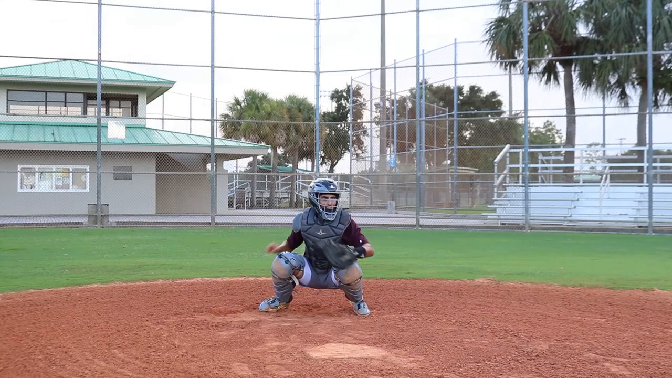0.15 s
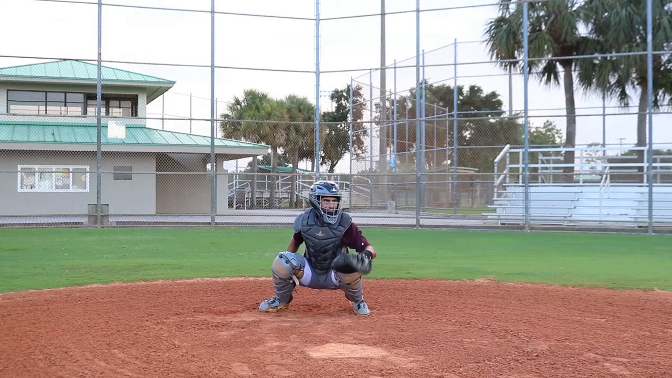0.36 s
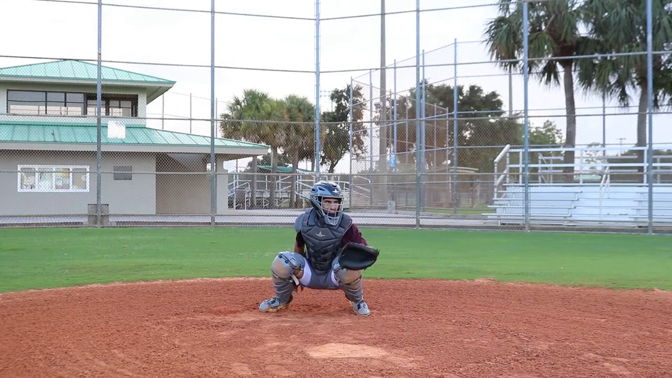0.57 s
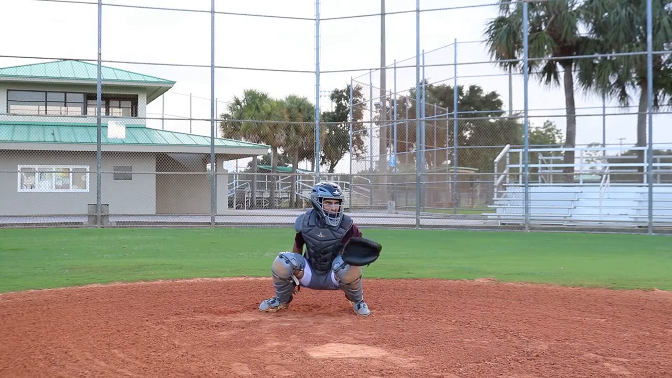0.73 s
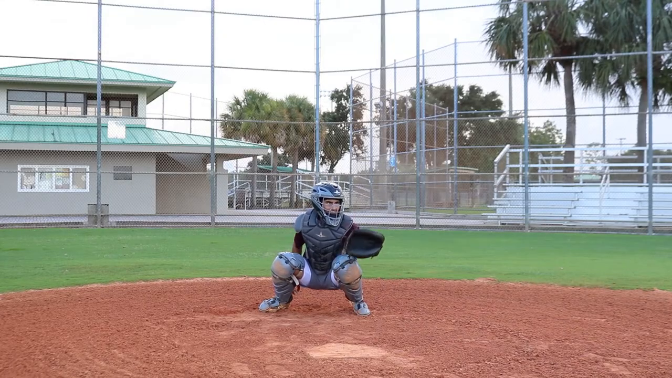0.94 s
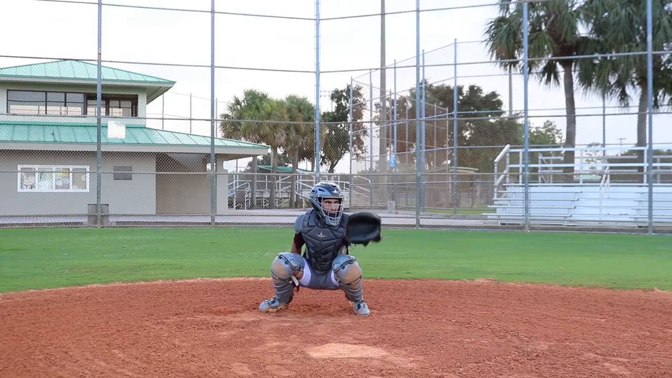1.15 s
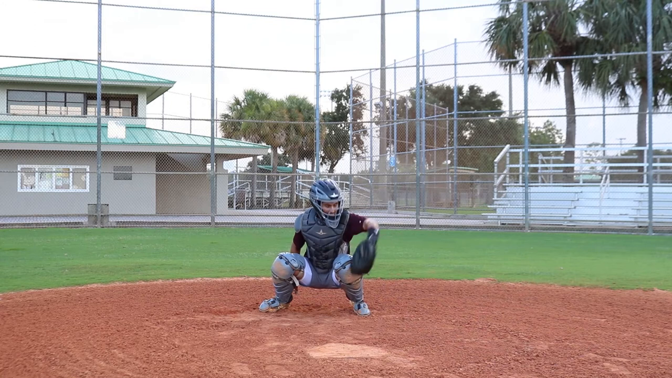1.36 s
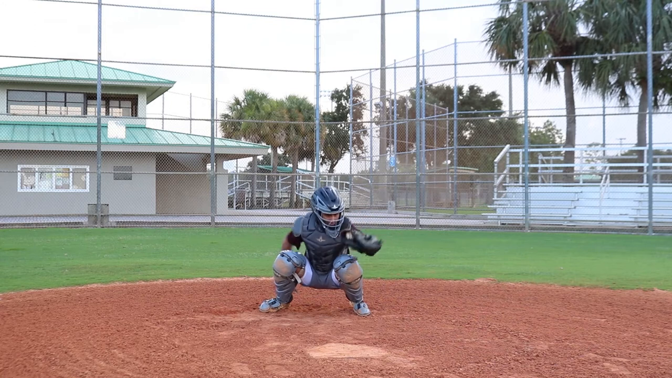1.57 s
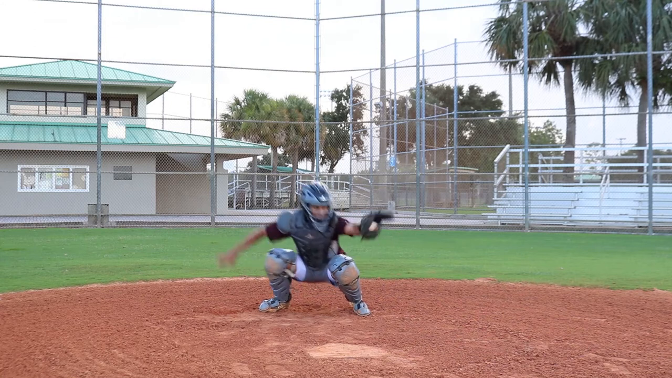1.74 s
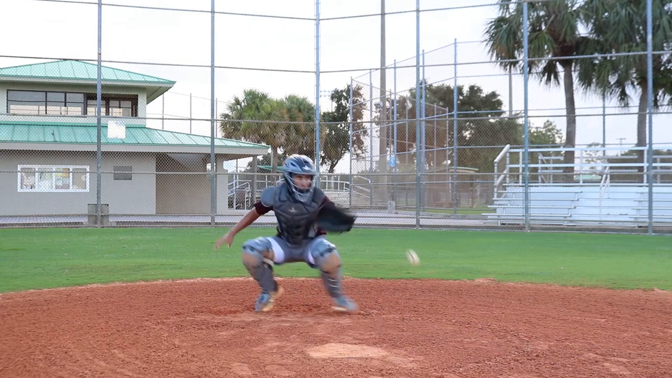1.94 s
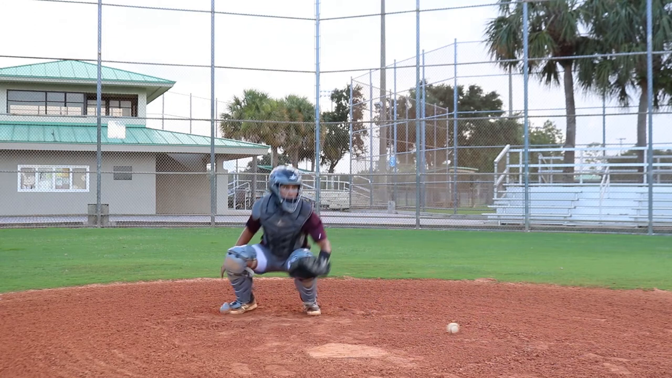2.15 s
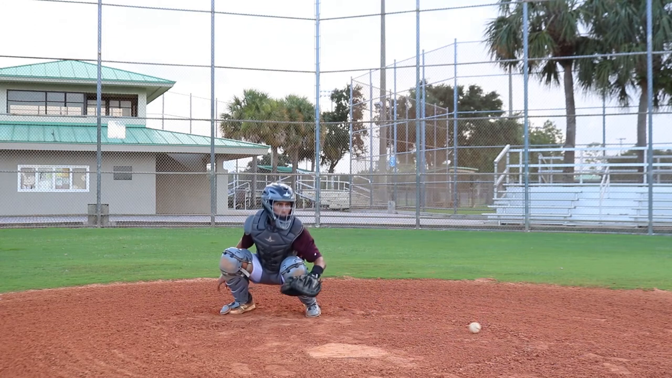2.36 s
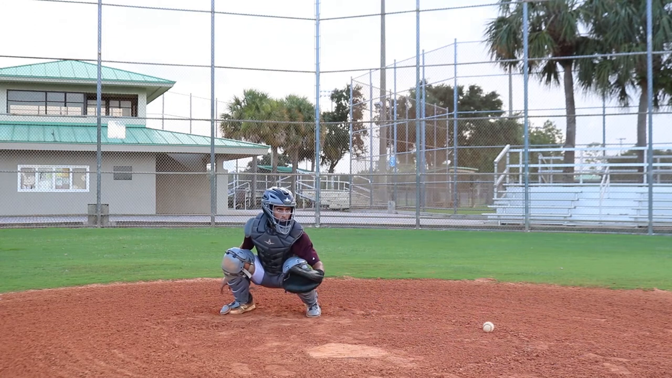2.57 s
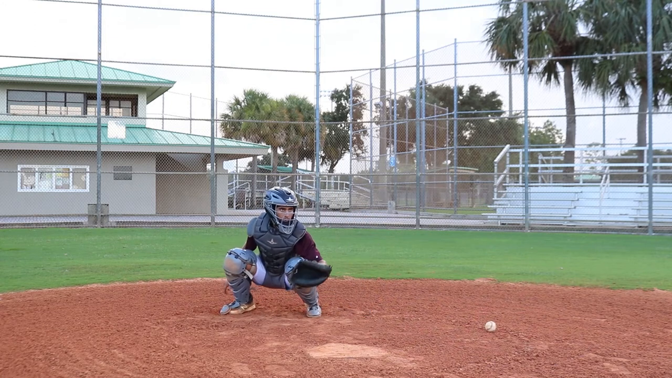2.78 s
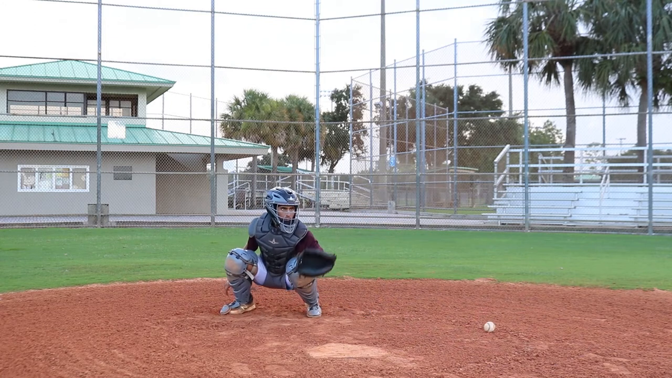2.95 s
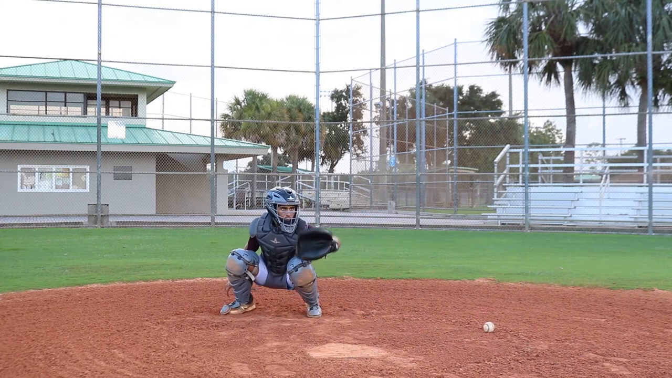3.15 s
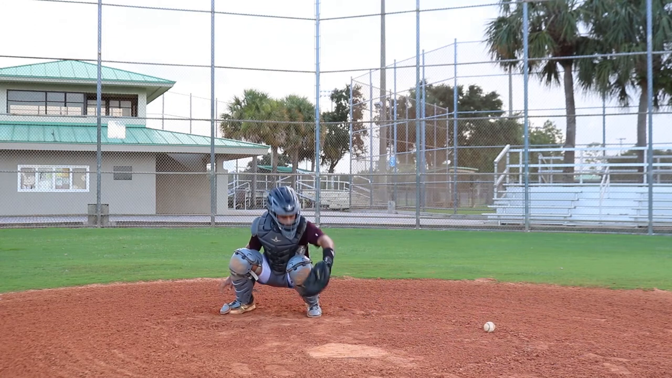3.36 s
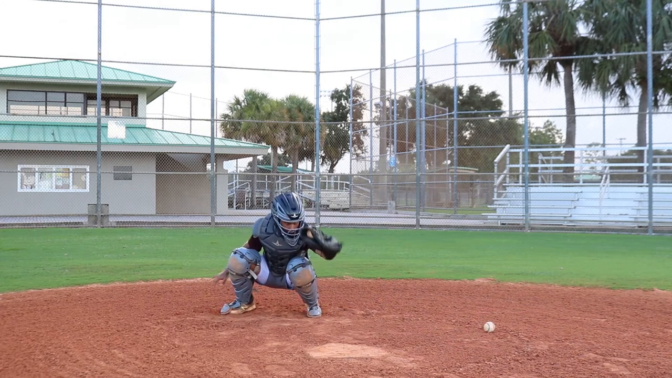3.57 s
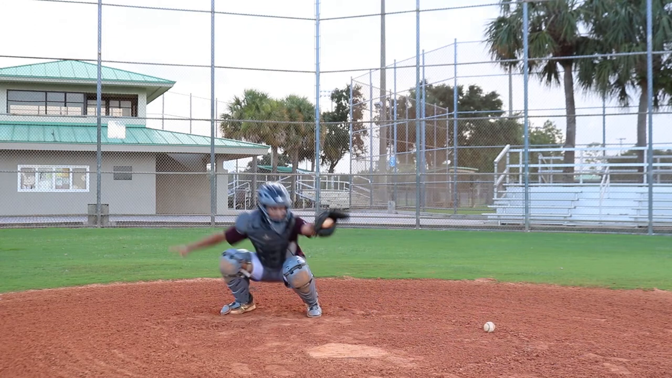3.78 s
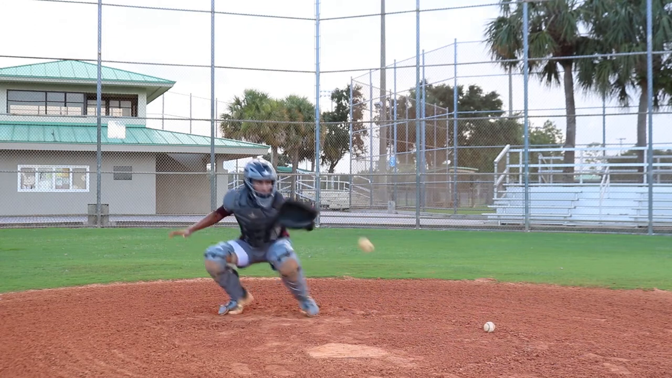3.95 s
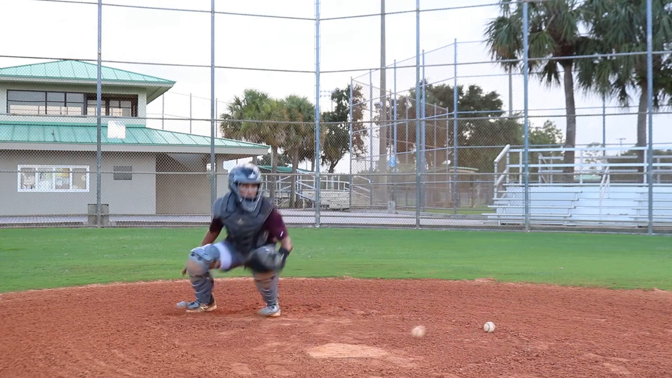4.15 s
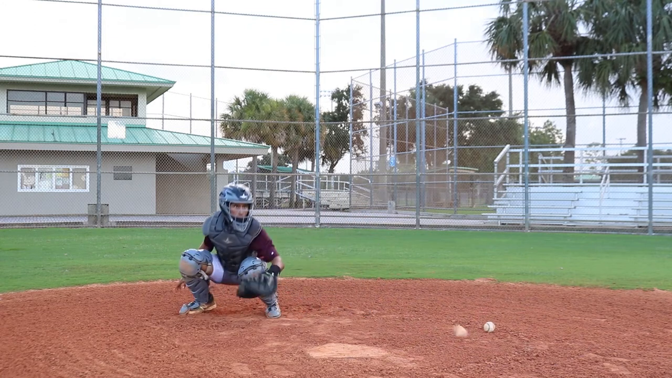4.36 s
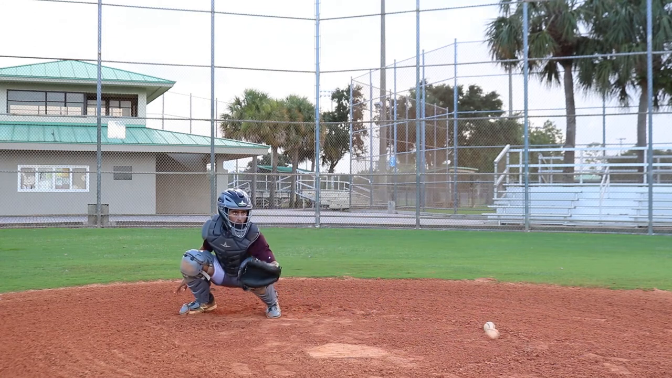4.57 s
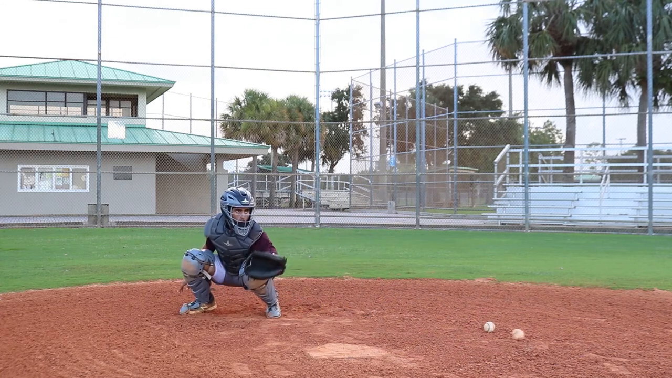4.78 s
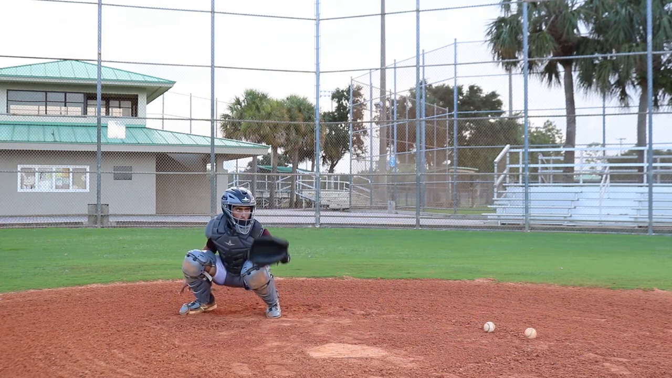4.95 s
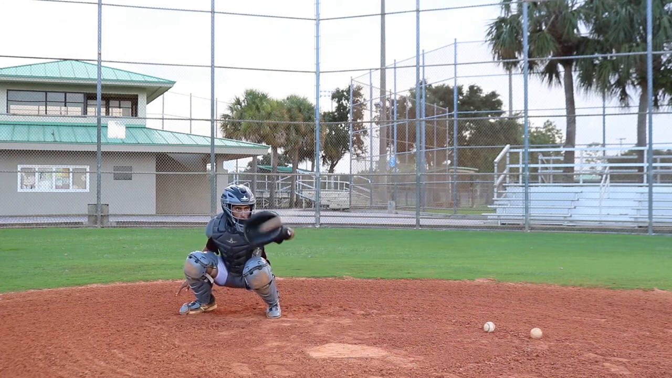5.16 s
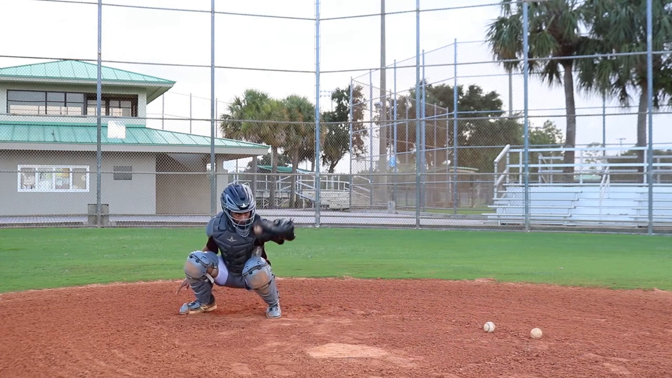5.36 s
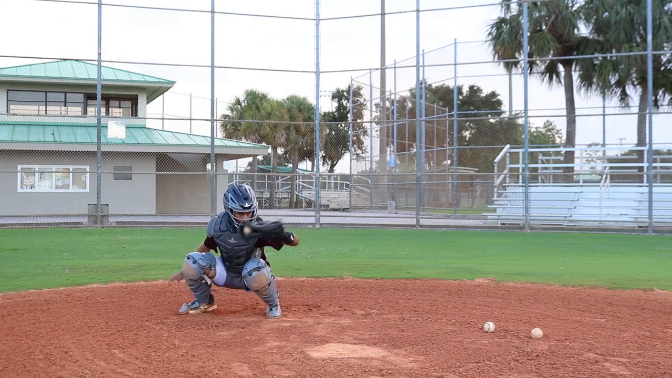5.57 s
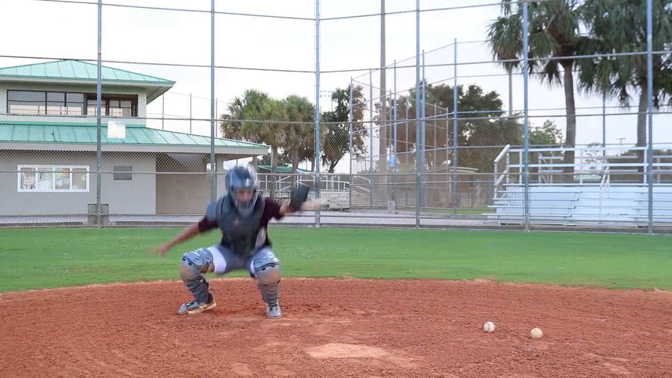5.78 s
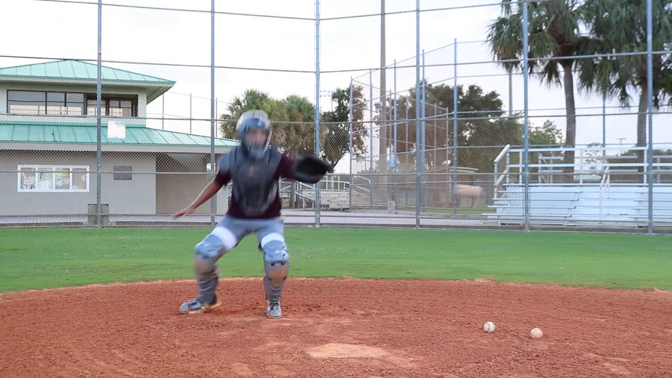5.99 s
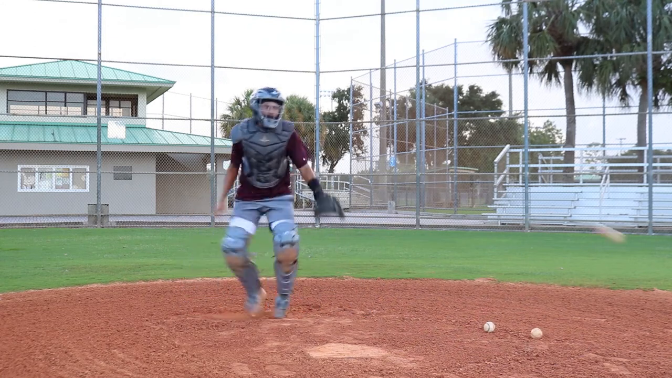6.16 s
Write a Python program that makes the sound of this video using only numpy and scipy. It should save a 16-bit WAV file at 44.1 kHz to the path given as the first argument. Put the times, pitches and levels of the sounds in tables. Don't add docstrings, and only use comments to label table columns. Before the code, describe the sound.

Outdoors, balls pop sharply into a catcher's mitt three times, each answered by quick slapback, with soft dirt thuds and gear ticks between.

```python
import sys
import numpy as np
from scipy import signal
from scipy.fft import rfft, irfft
from scipy.io import wavfile
from scipy.ndimage import uniform_filter1d

SR = 44100
rng = np.random.default_rng(int(sys.argv[2]) if len(sys.argv) > 2 else 0)


def to_wav(s):
    ch = np.atleast_2d(s).T
    pcm = np.round(np.clip(ch, -1, 1) * 32767)
    wavfile.write(sys.argv[1], SR, pcm.astype(np.int16))


def level_to_linear(level):
    exponent = np.asarray(level, float) / 20
    return 10 ** exponent


N = 274302
T = np.arange(N) / SR

# start_s, blow_db, crack_db, grit_db
CATCHES = [
    (1.3929, 10, -0.5, -30),
    (3.361, 8, -22, -21),
    (5.2459, 12, 5, -30),
]
# late_s, thump_db, near_extra_db, slap_db, thump_hz
RETURNS = [(-0.0007, -1.8, -7, 0.5, 320), (0.0006, 2, 5, -1.5, 300), (0.0001, -2, -3, 0.9, 318)]
SLAP_HZ = 1360
SLAP_LEAD_S = 1 / (2 * SLAP_HZ)


def level(x, db):
    return x * level_to_linear(db) / np.sqrt(np.mean(x ** 2))


def tint(points):
    hz, db = np.transpose(points)
    f = np.fft.rfftfreq(N, 1 / SR) + 1
    gain = level_to_linear(np.interp(np.log(f), np.log(hz), db))
    return irfft(rfft(rng.standard_normal(N)) * gain, N)


def band(x, lo_hz, hi_hz):
    sos = signal.butter(2, [lo_hz, min(hi_hz, 0.45 * SR)], "band", fs=SR, output="sos")
    return signal.sosfilt(sos, x)


def walk(rate_hz):
    hold = int(SR / rate_hz)
    steps = np.repeat(rng.standard_normal(N // 100), hold)[:N]
    return 1.292 * uniform_filter1d(uniform_filter1d(steps, hold), hold)


def fade(t, t60):
    return (t >= 0) * np.exp(-np.log(1000) * np.abs(t) / t60)


def add(out, s, make, size=2048):
    i = int(s * SR)
    piece = make(T[:size] - (s - i / SR))[:N - i]
    out[i:i + len(piece)] += piece


def road():
    # frequency_hz, density_db
    roar_spectrum = [(18, -30), (30, -27), (48, -5), (90, -4.5), (118, -3.5), (184, -3.5), (259, -8),
                     (287, -12.5), (345, -11), (449, -20), (822, -11.5), (1100, -9), (3870, -35),
                     (14800, -46.5), (16000, -42)]
    # time_s, level_db
    traffic = [(0.0, -46.5), (0.26, -41), (0.74, -42), (1.12, -39), (1.52, -36.5), (1.77, -34.5),
               (2.77, -42), (3.07, -36.5), (3.45, -41), (3.86, -34), (4.23, -35.5), (4.88, -40.5),
               (5.04, -36.5), (5.21, -38), (5.42, -38.5), (5.6, -35.5), (6.01, -44), (6.22, -35)]
    # frequency_hz, level_db
    hum_tones = [(128, -42.5), (258, -46.5)]
    road_db = -36
    load_db = np.interp(T, *np.transpose(traffic))
    load_db = load_db - np.mean(load_db[:SR])
    engines_db, deep_db = 0.95 * load_db, 1.05 * load_db
    tyres_db = 0.9 * np.exp(-((T - 4.6) / 0.97) ** 2)
    spectrum = rfft(level(tint(roar_spectrum), road_db))
    f = np.log2(np.fft.rfftfreq(N, 1 / SR) + 1)
    roar = 0
    for octave in np.arange(4, 14.6, 0.5):
        overlap = np.sqrt(np.clip(1 - 2 * np.abs(f - octave), 0, 1) / 2)
        part = irfft(spectrum * overlap, N)
        bass = np.clip((8.5 - octave) / 1.77, 0, 1)
        middle = (1 - bass) * np.clip((12.2 - octave) / 1.4, 0, 1)
        bass_db = engines_db if 2 ** octave > 95 else deep_db
        flicker_db = (-0.02 + 1.66 * bass) * walk(9.8)
        roar = roar + part * level_to_linear(bass * bass_db + middle * tyres_db + flicker_db)
    hum = 0
    for hz, db in hum_tones:
        strength = level_to_linear(db + 5.5 * walk(4))
        turns = np.cumsum(hz * (1 + 0.02433 * walk(8.2))) / SR
        hum = hum + strength * np.sin(2 * np.pi * turns)
    return level(roar, road_db + 1.73) + hum


def whistle(t, length, hz, db, fall_hz):
    crest, swell_db, arch_hz, fall_s = 0.89, 19, 100, 0.017
    u = np.clip(t / length, 0, 1)
    edge = np.clip(np.minimum(t, length - t) / 0.004, 0, 1)
    away = np.where(u < crest, 1 - u / crest, (u - crest) / (1 - crest))
    drop = np.clip(1 - (length - t) / fall_s, 0, 1) ** 2
    pitch = hz + arch_hz * np.sin(np.pi * u) - fall_hz * drop
    return edge * level_to_linear(db - swell_db * away ** 2) * np.sin(2 * np.pi * np.cumsum(pitch) / SR)


def bird():
    # start_s, length_s, pitch_hz, level_db, closing_fall_hz
    calls = [(0.005, 0.1, 7060, -40.5, 400), (0.306, 0.029, 7020, -50.5, 330),
             (3.392, 0.051, 6560, -41, 170), (3.594, 0.071, 6720, -52, 15), (3.67, 0.14, 6700, -63, 5),
             (4.866, 0.04, 6930, -53, 10), (5.183, 0.043, 7050, -48, 40)]
    out = np.zeros(N)
    for s, *call in calls:
        add(out, s, lambda t: whistle(t, *call), size=8192)
    return out + level_to_linear(-20) * np.interp(T - 0.05, T, out)


def shuffle():
    # frequency_hz, density_db
    scuff_spectrum = [(1500, 0), (3000, -12), (4800, -1), (6500, -4.5), (8400, -2), (9800, -9.5),
                      (11500, -12.5), (13500, -11), (16000, -22)]
    # strongest_s, level_db, build_up_s, carry_on_s
    moves = [(1.166, -56.5, 0.12, 0.2), (1.898, -64, 0.08, 0.01), (1.992, -64, 0.05, 0.08),
             (2.14, -58, 0.12, 0.01), (3.11, -55.5, 0.067, 0.24), (4.156, -60.5, 0.15, 0.12),
             (4.884, -60, 0.08, 0.005), (5.03, -56, 0.17, 0.2), (6.126, -56, 0.12, 0.0043)]
    build_db, sag_db_s, stop_db_s = 16, 23, 600
    grit = level(tint(scuff_spectrum) * level_to_linear(2.4 * walk(60)), 0)
    levels_db = []
    for s, db, build_s, carry_s in moves:
        loss_db = np.where(T < s, build_db * (s - T) / build_s, sag_db_s * (T - s))
        stop_db = stop_db_s * np.clip(T - s - carry_s, 0, None)
        levels_db.append(db - loss_db - stop_db)
    return grit * level_to_linear(np.max(levels_db, axis=0) + 6.0)


def thuds():
    # start_s, peak_db, pitch_hz, t60_s
    contacts = [(1.65, -16, 102, 0.093), (1.741, -18.5, 145, 0.078), (1.77, -22, 161, 0.065),
                (1.83, -18.5, 121, 0.085), (1.957, -15, 123, 0.04), (2.094, -14.5, 123, 0.048),
                (2.299, -22, 135, 0.092), (2.398, -26, 91, 0.06), (3.778, -16, 119, 0.091),
                (4.248, -24, 121, 0.058), (4.317, -21, 127, 0.093), (4.558, -21, 120.4, 0.3)]
    out = np.zeros(N)
    for s, db, hz, t60 in contacts:
        add(out, s, lambda t: level_to_linear(db) * fade(t, t60) * (1 - fade(t, 0.025))
            * np.sin(2 * np.pi * hz * t), size=4096)
    return band(out, 42, 820)


def ticks(table, lift_db, ring_db, t60):
    # frequency_hz, level_db
    guard_modes = [(2330, -5), (3400, -14), (4050, -2.5)]

    def guard_ring(t):
        return sum(level_to_linear(g) * np.sin(2 * np.pi * hz * t) for hz, g in guard_modes)

    out = np.zeros(N)
    for s, db, bright_db in table:
        bands = [(0, 1900, 4160), (bright_db, 5000, 9600), (0.7 * bright_db - 18, 10000, 12000)]
        for part_db, lo_hz, hi_hz in bands:
            burst_db = db + part_db + lift_db
            add(out, s, lambda t: fade(t, t60)
                * level(band(rng.standard_normal(len(t)), lo_hz, hi_hz), burst_db))
        add(out, s, lambda t: level_to_linear(db + ring_db) * fade(t, t60) * guard_ring(t))
    return out


def gear():
    # start_s, level_db, brightness_db
    gear_ticks = [(0.0944, -50, 8), (1.8245, -28, -8), (2.0944, -49, 4), (2.146, -46.5, 15),
                  (2.1584, -49, 7), (2.182, -35.5, 1), (2.295, -52, 4), (2.4824, -41, -4),
                  (3.8638, -25.5, -17), (4.1554, -53, 5), (4.1889, -42, 0), (4.2243, -24.5, -20),
                  (4.2604, -44, -3), (4.4543, -40, -5), (5.8204, -45, -3), (6.12, -58, 15),
                  (6.1878, -38.5, -7)]
    # start_s, level_db, brightness_db
    after_clicks = [(1.419, -40, -16), (1.438, -31, -5), (3.3704, -42, -1.5), (3.3734, -51, 1), (3.3874, -59, -5),
                    (3.3944, -57, 6), (3.4044, -50, 4), (5.272, -40, -6), (5.2984, -50, -15), (5.3106, -44, -12)]
    # start_s, level_db, brightness_db
    fingertip = [(3.3599, -15.5, -33)]
    hard = ticks(gear_ticks, -0.85, -1.6, 0.01)
    return hard + ticks(after_clicks, 8.2, 3.2, 0.0086) + ticks(fingertip, -1.1, -18.0, 0.03)


def thump(t, hz, t60, sag, sag_s):
    turns = hz * (t + sag * sag_s * (1 - np.exp(-np.abs(t) / sag_s)))
    return fade(t, t60) * np.sin(2 * np.pi * turns)


def scatter():
    # frequency_hz, density_db
    scattered_spectrum = [(700, -22), (1100, -20.5), (1600, 5), (3000, -4.5), (4500, -5.5), (6800, -12.5),
                          (8600, -11), (10500, -16), (15500, -37)]
    # delay_s, slap_db, thump_db
    scatter_shape = [(0.082, -49, -46), (0.094, -34.5, -32), (0.115, -37, -28), (0.141, -37, -38),
                     (0.15, -36.5, -26), (0.222, -50.5, -43), (0.263, -52, -38)]
    wide, clumps = level(tint(scattered_spectrum), 1.5), walk(420)
    slaps = 0
    for hz in 650 * 2 ** np.arange(5):
        slaps = slaps + band(wide, hz, 2 * hz) * level_to_linear(2.0 * clumps + 1.8 * walk(300))
    thumps = level(band(band(rng.standard_normal(N), 240, 540), 220, 540), -5.0)
    delay, slap_db, thump_db = np.transpose(scatter_shape)

    def shape(t, db, edge_s):
        times = [delay[0] - edge_s, *delay, delay[-1] + edge_s]
        return level_to_linear(np.interp(t, times, [-90, *db, -90]))

    out = np.zeros(N)
    for (s, *_), (_, sent_db, _, crack_db, _) in zip(CATCHES, RETURNS):
        out += slaps * level_to_linear(crack_db) * shape(T - s, slap_db, 0.006)
        out += thumps * level_to_linear(sent_db) * shape(T - s, thump_db, 0.02)
    return out


def knock(t, db, hz, slap_db):
    slap = -level_to_linear(slap_db) * fade(t, 0.0055) * np.sin(2 * np.pi * SLAP_HZ * t)
    return level_to_linear(db) * thump(t - SLAP_LEAD_S, hz, 0.025, sag=0.25, sag_s=0.0013) + slap


def echoes():
    # thump_db, pitch_hz, slap_db
    landing = (-20, 320, -40)
    # delay_s, thump_db, slap_db, click_db, click_brightness_db
    surfaces = [(0.093, -29, -33, -46, 5), (0.102, -33, -49, -38, -2), (0.1136, -35, -29, -26, -6),
                (0.1514, -12, -17.5, -29, -8), (0.1684, -21.5, -20, -31, -20)]
    out, clicks = np.zeros(N), []
    add(out, 4.2257 - SLAP_LEAD_S, lambda t: knock(t, *landing))
    for (s, *_), (late, sent_db, near_db, crack_db, hz) in zip(CATCHES, RETURNS):
        for delay, thump_db, slap_db, click_db, bright_db in surfaces:
            near = delay < 0.13
            arrival = s + late + delay
            back_db = thump_db + sent_db + near * near_db
            back_hz = hz * 1.33 ** near
            add(out, arrival - SLAP_LEAD_S, lambda t: knock(t, back_db, back_hz, slap_db + crack_db))
            clicks.append((arrival - 0.001, click_db + crack_db, bright_db))
    return level_to_linear(4.5) * band(out, 166, 4800) + ticks(clicks, -1.9, -13.0, 0.014)


def pop(t, modes, crack_db, grit_db):
    (hz, pocket_db, t60), *leather = modes
    body = sum(level_to_linear(db) * fade(t, d) * np.sin(2 * np.pi * f * t + 0.5) for f, db, d in leather)
    burst = level_to_linear(crack_db) * fade(t, 0.0021) + level_to_linear(grit_db) * fade(t, 0.022)
    crack = burst * band(rng.standard_normal(len(t)), 1000, 12800)
    pocket = level_to_linear(pocket_db) * thump(t, hz, t60, sag=0.78, sag_s=0.00072)
    return (body + crack) * (1 - fade(t, 0.0033)) + pocket


def catches():
    # frequency_hz, level_db, t60_s
    mitt_modes = [
        [(256.4, -4.5, 0.02), (520, -1.5, 0.011), (1364, 2, 0.0073), (1720, -0.5, 0.0047), (2066, 3.5, 0.004),
         (2910, -1.5, 0.0083), (3660, -1, 0.0051), (5870, -6.5, 0.0041), (8130, -11, 0.0051)],
        [(258, -3.5, 0.026), (520, -4, 0.019), (1410, 6.5, 0.0027), (1690, -2.5, 0.0069), (2444, -1, 0.0082),
         (3490, -15, 0.016), (4180, -7, 0.004), (5540, -17, 0.013), (8700, -5.5, 0.0042), (12800, -10, 0.004)],
        [(300, -6.5, 0.026), (595, -11, 0.019), (942, 7, 0.0063), (1542, -3, 0.009), (2640, -8.5, 0.004),
         (3330, -5.5, 0.0056), (4350, -2, 0.005), (5640, -11.5, 0.004), (7800, -13, 0.0027)],
    ]
    out = np.zeros(N)
    for (s, blow_db, *contact_db), modes in zip(CATCHES, mitt_modes):
        add(out, s, lambda t: level_to_linear(blow_db)
            * band(band(pop(t, modes, *contact_db), 147, 23000), 147, 23000))
    return out


def scene():
    background = road() + bird()
    catcher = shuffle() + thuds() + gear()
    mono = background + catcher + scatter() + echoes() + catches()
    return np.array([mono, mono])


def roll_off(x):
    return signal.sosfilt(signal.butter(12, 17040, fs=SR, output="sos"), x)


def record(dry):
    # frequency_hz, density_db
    hiss_spectrum = [(880, -75), (1500, -45), (2320, -40), (2390, -9), (2690, -9), (3690, -5.5),
                     (16000, -2.5)]
    attack_s, hold_s, release_s = 0.0043, 0.086, 0.0018
    hiss = level(tint(hiss_spectrum), -63.5)
    loud = dry + hiss * np.array([[1], [-1]])
    low_pass = signal.ellip(10, 0.2, 70, 15700, fs=SR, output="sos")
    loud = signal.sosfilt(low_pass, loud)
    over = np.flatnonzero(np.abs(loud[0]) > 1)
    first_over = over[np.diff(over, prepend=-SR) > SR // 2]
    gain_db = np.zeros(N)
    for i in first_over:
        t = T - T[i]
        depth_db = 20 * np.log10(np.abs(loud[0, i:i + 256]).max())
        attack = (t > 0) * (1 - np.exp(-np.abs(t) / attack_s))
        release = np.clip(1 - (t - hold_s) / release_s, 0, 1)
        gain_db -= depth_db * attack * release
    return roll_off(np.clip(loud * level_to_linear(gain_db), -1, 1))


dry = scene()
out = record(dry)
to_wav(out)
```